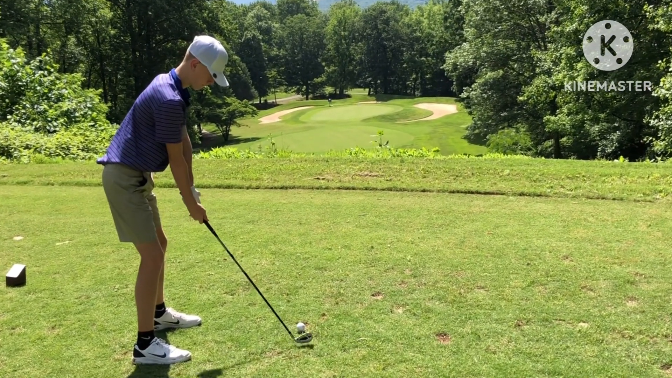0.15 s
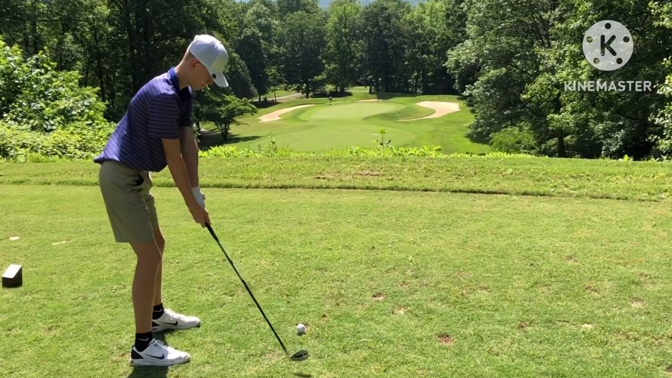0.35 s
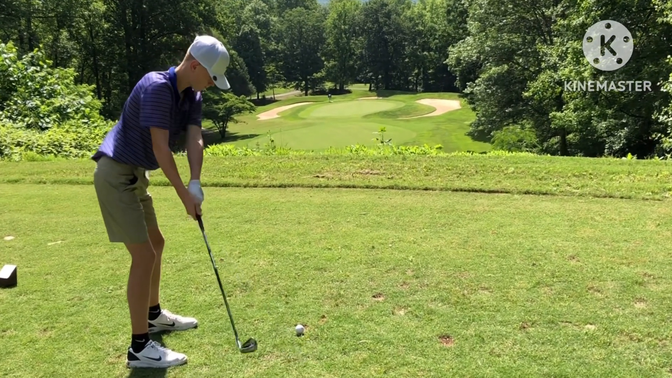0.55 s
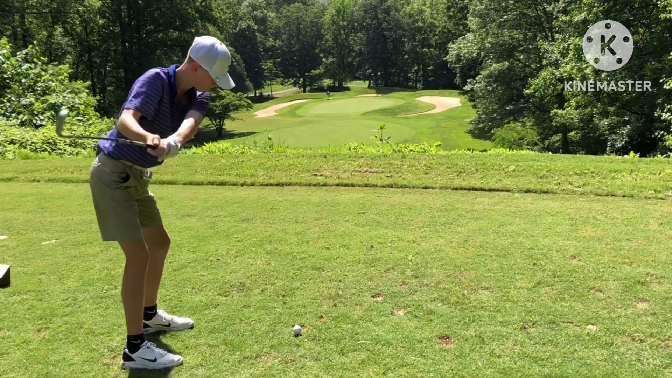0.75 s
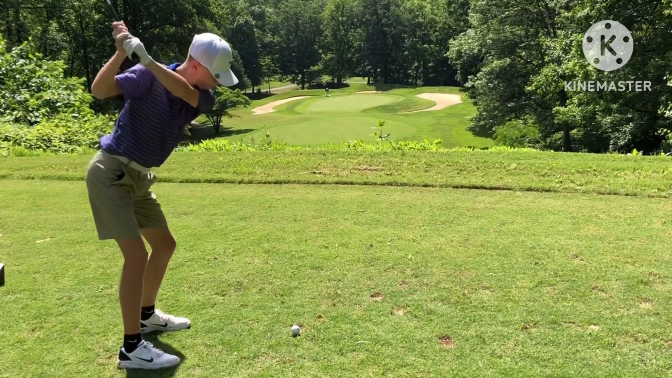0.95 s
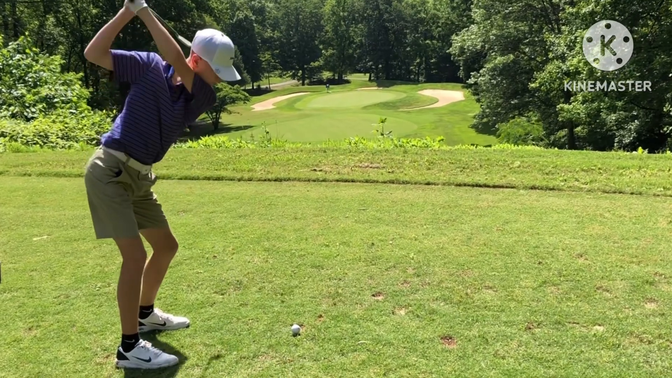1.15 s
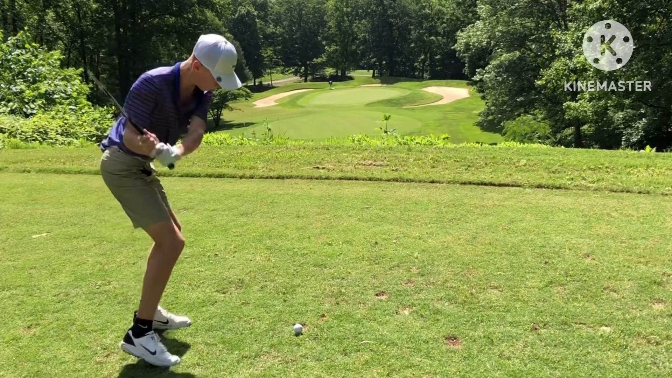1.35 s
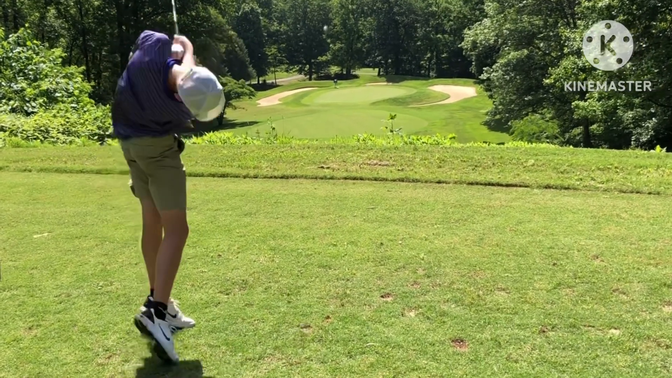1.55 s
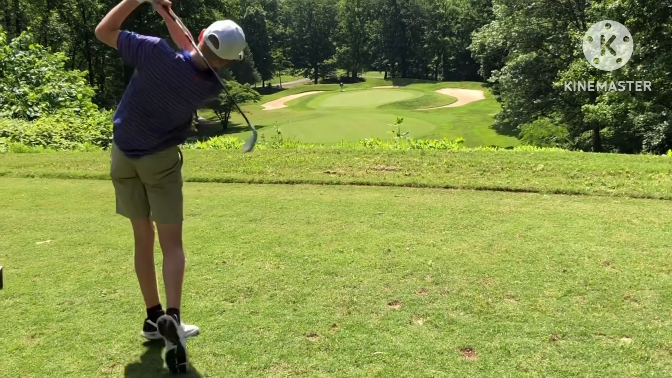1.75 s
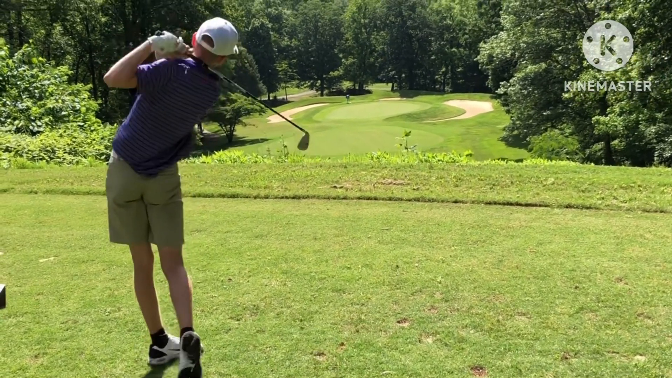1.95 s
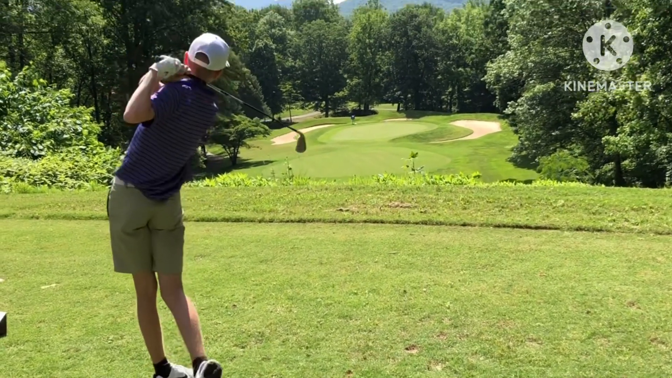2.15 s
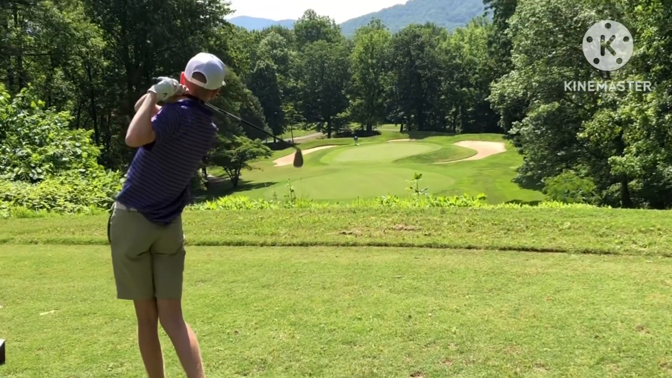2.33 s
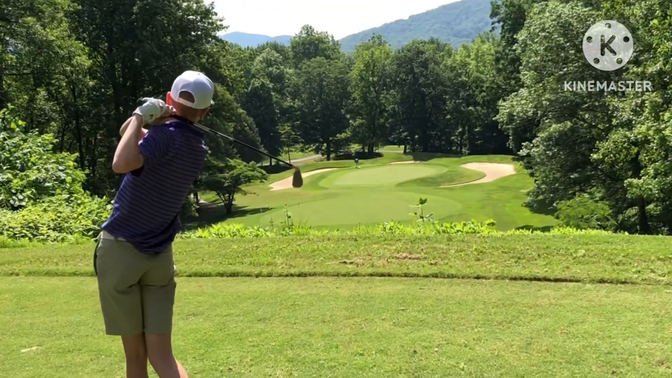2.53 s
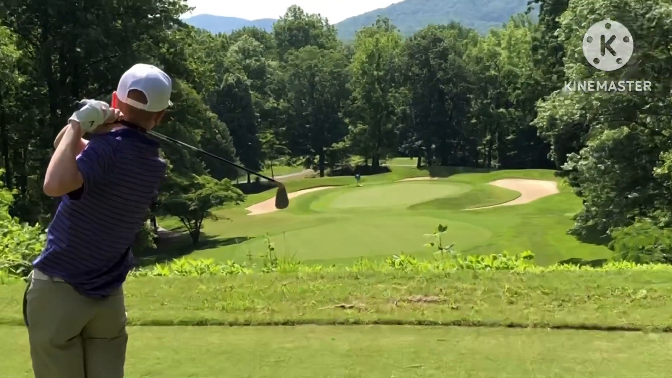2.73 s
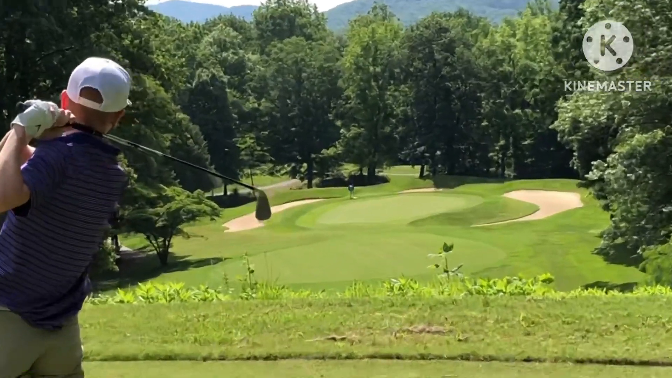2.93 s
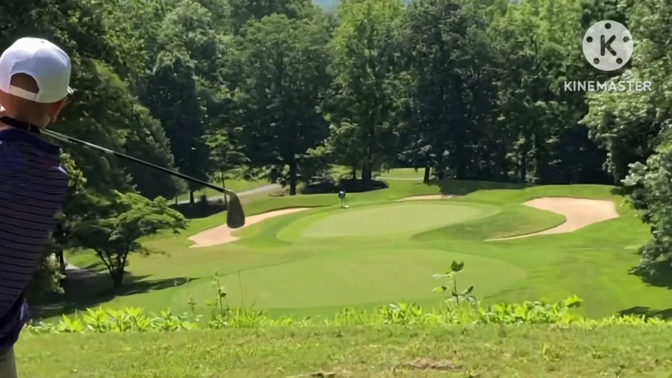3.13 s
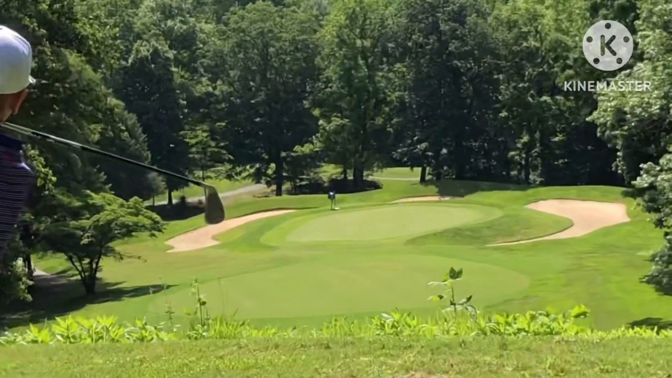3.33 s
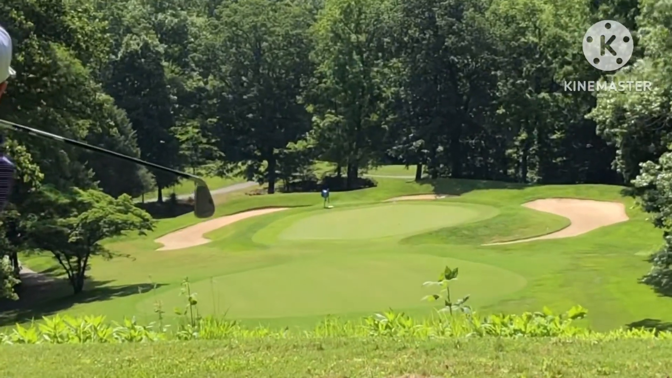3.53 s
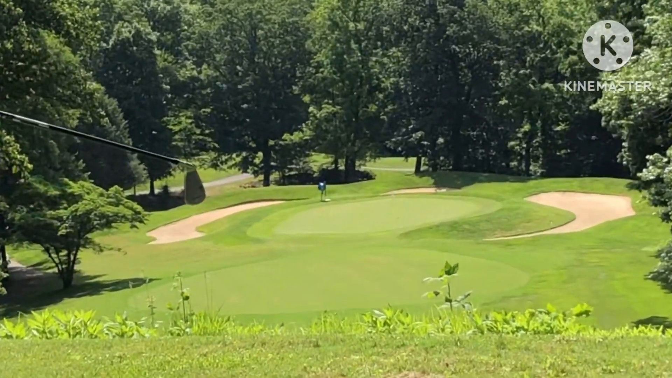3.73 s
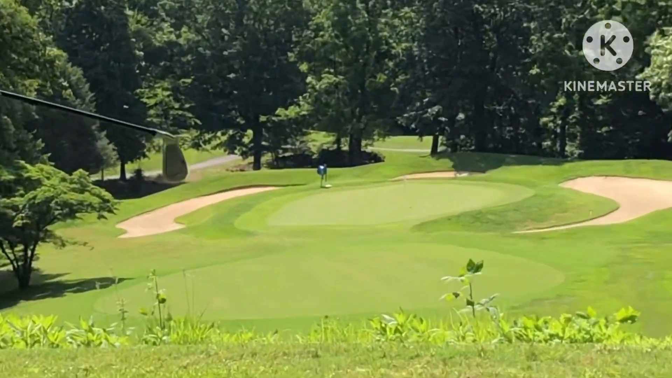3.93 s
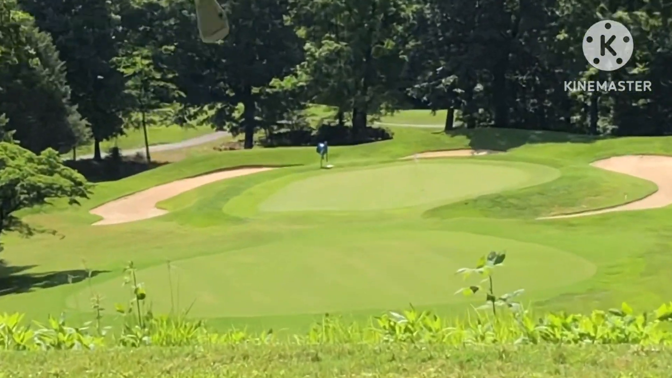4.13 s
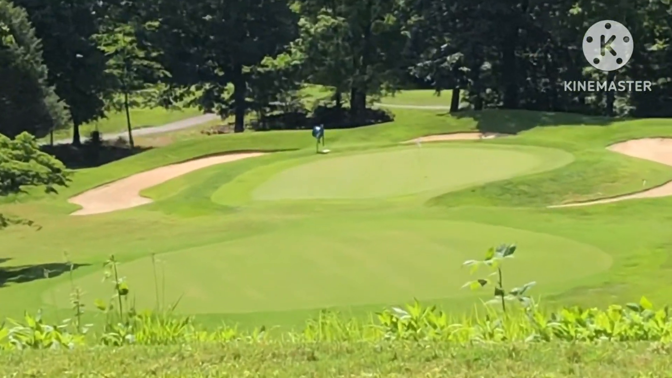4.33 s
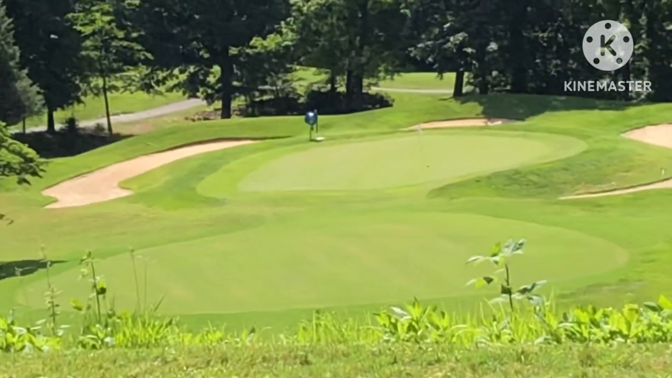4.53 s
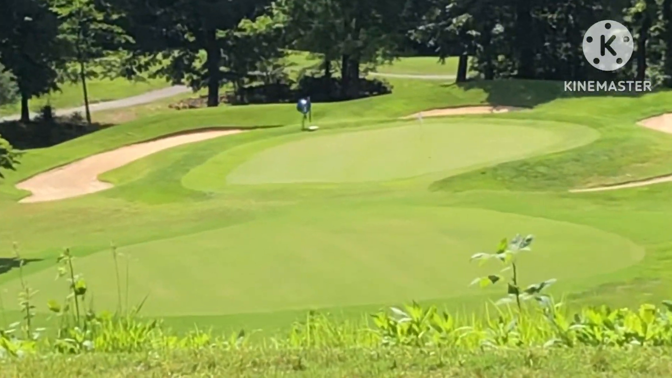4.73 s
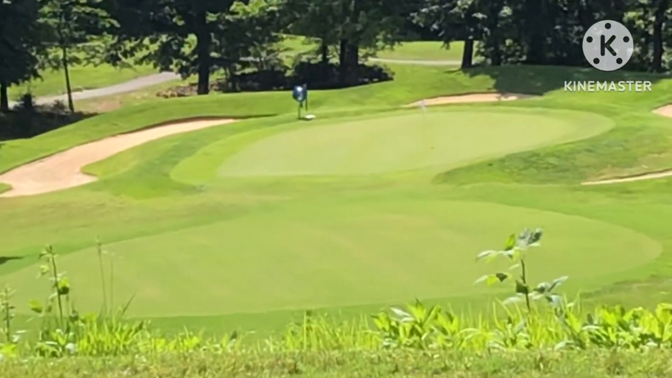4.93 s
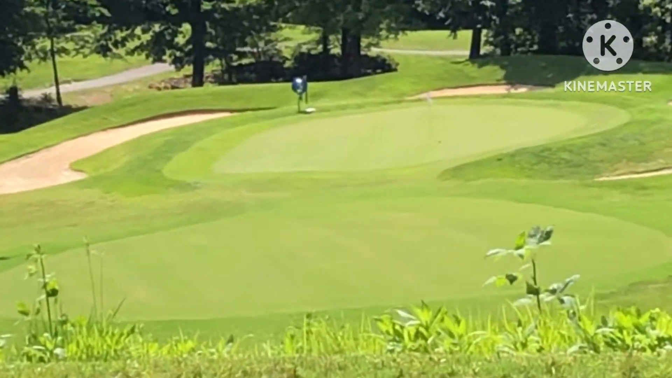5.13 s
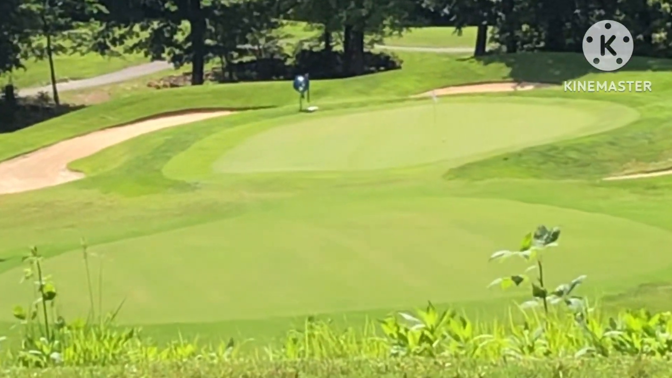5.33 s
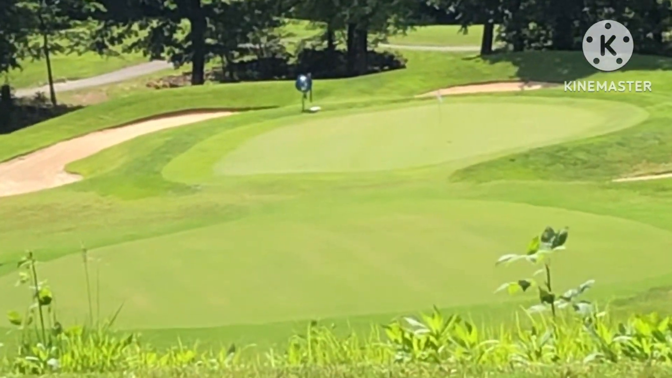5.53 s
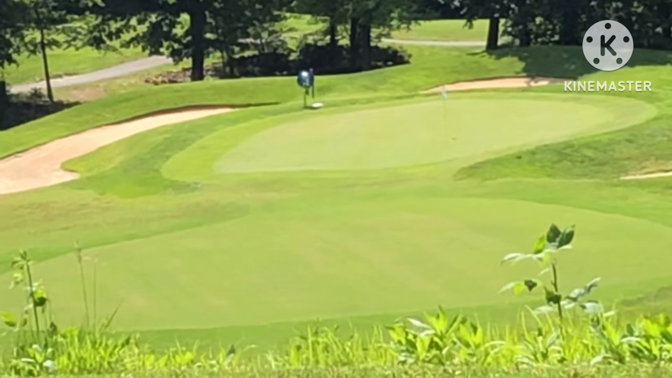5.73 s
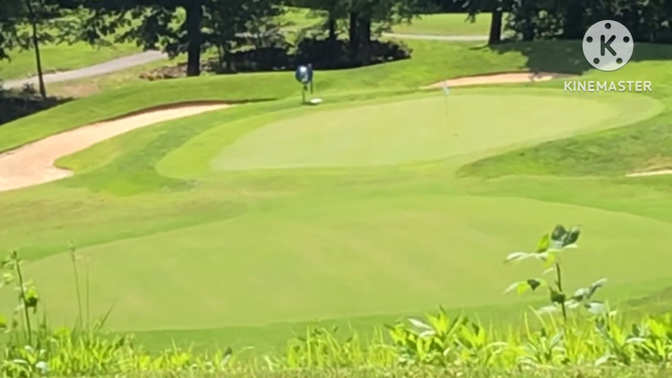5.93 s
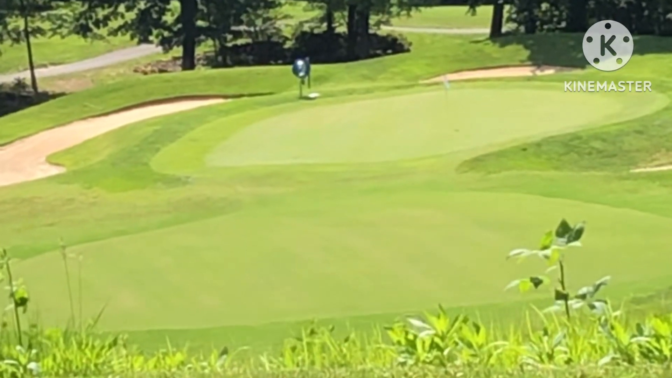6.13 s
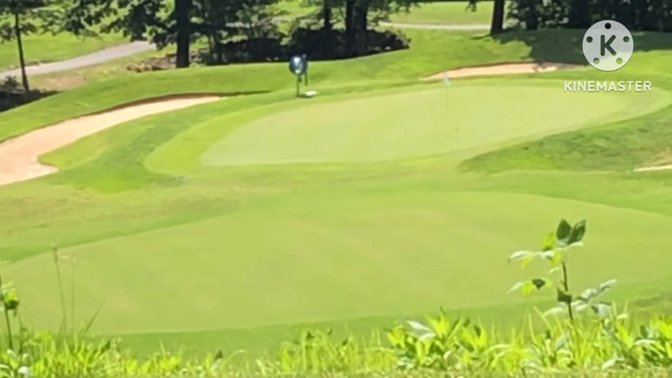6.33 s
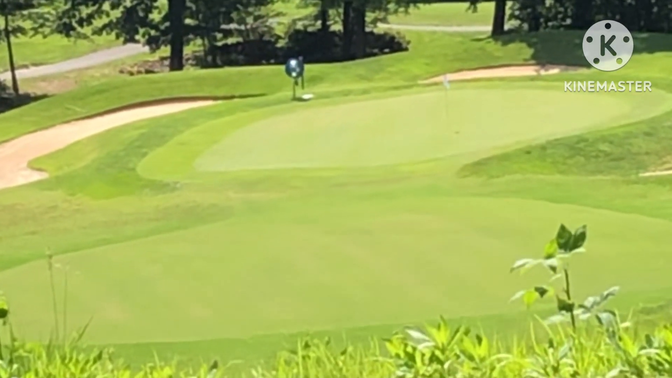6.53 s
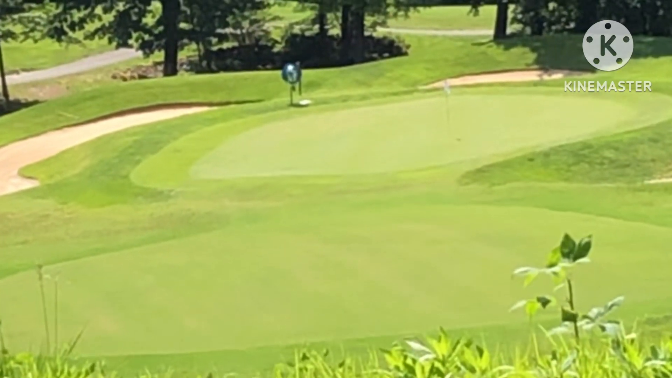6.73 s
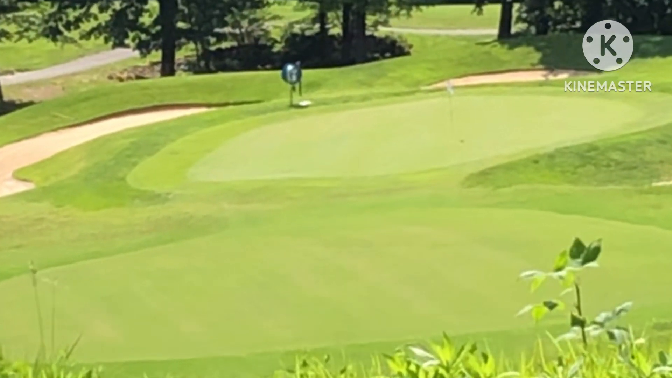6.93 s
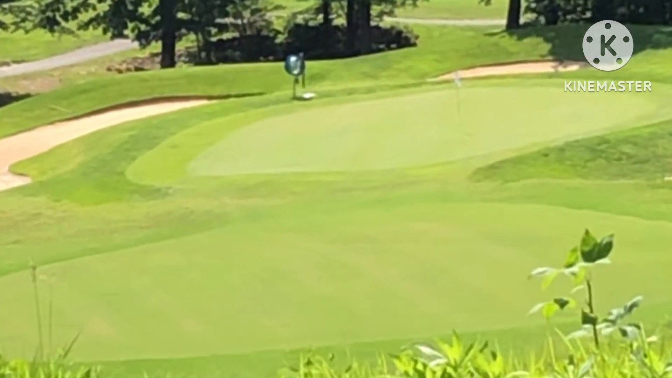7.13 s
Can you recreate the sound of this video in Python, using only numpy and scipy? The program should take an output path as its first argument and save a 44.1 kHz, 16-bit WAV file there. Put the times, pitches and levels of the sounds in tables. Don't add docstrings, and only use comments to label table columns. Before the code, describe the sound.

A golf club whooshes and cracks hard against a ball, echoing off surrounding trees, with songbirds whistling over soft wind and a faint distant drone.

```python
import sys
import numpy as np
from scipy import signal
from scipy.fft import rfft, irfft, next_fast_len
from scipy.io import wavfile
from scipy.ndimage import map_coordinates

SR = 44100
rng = np.random.default_rng(int(sys.argv[2]) if len(sys.argv) > 2 else 0)


def wrap_up_sound(samples):
    columns = np.atleast_2d(samples).T
    tamed = np.clip(columns, -1, 1)
    steps = np.round(tamed * 32767).astype(np.int16)
    wavfile.write(sys.argv[1], SR, steps)


def magnitude_from_level(level_db):
    exponent = np.asarray(level_db, float) / 20
    return 10 ** exponent


N = 316241


def unit(x):
    return x / np.sqrt(np.mean(x ** 2) + 1e-20)


def along(points, hz):
    f, *cols = np.transpose(points)
    return np.squeeze([np.interp(np.log(hz + 1), np.log(f + 1), c) for c in cols])


def curves(rows):
    s, *cols = np.transpose(rows)
    return [np.interp(np.arange(N) / SR, s, c) for c in cols]


def wobble(rate):
    knots = rng.standard_normal(int(N * rate / SR) + 4)
    return map_coordinates(knots, [np.arange(N) * rate / SR])


def noise(gain):
    m = next_fast_len(N)
    spectrum = rfft(rng.standard_normal(m)) * gain(np.fft.rfftfreq(m, 1 / SR))
    return unit(irfft(spectrum, m)[:N])


def coloured(spectrum):
    return noise(lambda hz: magnitude_from_level(along(spectrum, hz)))


def since(s):
    return np.maximum(np.arange(N) / SR - s, 0)


def ring(modes, s, attack):
    start = round(s * SR)
    t = since(s)[start:][:SR // 4]
    tones = sum(-magnitude_from_level(db - 60 * t / t60) * np.sin(2 * np.pi * hz * t) for hz, db, t60 in modes)
    out = np.zeros(N)
    out[start:][:len(t)] = tones * (1 - np.exp(-t / attack))
    return out


def scattered(spectrum, shape):
    hz, t, z = signal.stft(rng.standard_normal(2 * SR), SR, nperseg=256)
    rise, t60 = along(shape, hz)[:, :, None]
    fading = magnitude_from_level(along(spectrum, hz)[:, None] - 60 * t / t60)
    return unit(signal.istft(z * fading * (1 - np.exp(-t / rise)), SR, nperseg=256)[1])


def placed(x, s):
    return np.pad(x, (round(s * SR), N))[:N]


def air():
    # (time [s], strength [dB])
    breeze = [(0, 1), (.5, 0), (1.1, -.8), (1.5, 8), (2, 3), (2.5, 1.1), (3.1, -0.1), (3.75, -2),
              (4.05, -2), (4.3, 0.5), (4.6, -0.9), (5, 0.3), (5.5, 1), (6.1, -0.4), (6.7, -1), (7.17, 1.4)]
    # (frequency [Hz], level [dB per Hz])
    rumble_colour = [(12, -54.5), (20, -25.5), (42, -9.5), (113, -2), (145, -2), (184, -2.5), (331, -13),
                     (371, -11), (400, -11), (520, -45), (880, -120)]
    traffic_colour = [(150, -29), (250, -1), (328, -8.5), (373, -4), (398, -12.5), (425, -5), (722, -6.5),
                      (790, -5.5), (1650, -9.5), (1900, -11), (3410, -18), (5500, -30), (7150, -59),
                      (12100, -120)]
    leaf_colour = [(2500, -28.5), (4100, -1.5), (4700, -7.5), (6500, 1.5), (9000, -7), (13000, -17.5),
                   (16000, -18)]
    hiss_colour = [(2000, -30), (5000, -1), (9000, -1), (13000, -2), (16000, -3.5)]
    breeze_db, = curves(breeze)
    gust = wobble(3.08)
    rumble_db = -57 + breeze_db + 1.1 * gust + 1.2 * wobble(12)
    traffic_db = -57.5 + 0.41 * breeze_db + .4 * gust + 0.67 * wobble(10)
    leaves_db = -76.5 - 0.8 * since(0) + .8 * wobble(8) + .9 * gust
    rumble = magnitude_from_level(rumble_db) * coloured(rumble_colour)
    traffic = magnitude_from_level(traffic_db) * coloured(traffic_colour)
    leaves = magnitude_from_level(leaves_db) * coloured(leaf_colour)
    return rumble + traffic + leaves + magnitude_from_level(-77.5) * coloured(hiss_colour)


def drone():
    firing_hz, width_hz, steady_db = 122, 11, -69
    turn_s, turn_length_s, turn_db = 5.6, 0.43, 8.5
    swell_db = turn_db * np.exp(-((np.arange(N) / SR - turn_s) / turn_length_s) ** 2)
    return magnitude_from_level(steady_db + swell_db) * noise(lambda hz: 1 / (1 + ((hz - firing_hz) / width_hz) ** 2))


def note_curves(rows, bend, loudest, fade_db):
    u = np.linspace(0, 1, num=12)
    paths = []
    for s, length, hz, to_hz, db in rows:
        pitch = hz + (to_hz - hz) * bend(u)
        paths.append(np.transpose([s + length * u, pitch, db - fade_db * np.abs(u - loudest)]))
    return paths


def whistles(paths, quaver_db, blur_hz, wet_db, t60):
    t, voice = np.arange(N) / SR, np.zeros(N)
    blur = blur_hz * wobble(320)
    for path in paths:
        s, hz, db = np.transpose(path)
        span = slice(round((s[0] - .004) * SR), round((s[-1] + .004) * SR))
        u = t[span]
        to_edge = np.minimum(u - u[0], u[-1] - u)
        soft = np.sin(np.pi / 2 * np.clip(to_edge / 0.0047, 0, 1))
        phase = 2 * np.pi * np.cumsum(np.interp(u, s, hz) + blur[span]) / SR
        voice[span] += np.sqrt(2) * magnitude_from_level(np.interp(u, s, db)) * soft * np.sin(phase)
    tail = scattered([(1000, 0)], [(2500, .004, 0.58 * t60), (5000, .004, t60)])[:SR]
    trunks = scattered([(1000, 0)], [(4000, .003, .09)])[:SR // 5]
    voice = voice + magnitude_from_level(wet_db - 2.0) * signal.fftconvolve(voice, trunks / np.linalg.norm(trunks))[:N]
    echo = magnitude_from_level(wet_db) * signal.fftconvolve(voice, tail / np.linalg.norm(tail))[:N]
    flicker = magnitude_from_level(quaver_db * wobble(70) + 0.17)
    return flicker * (voice + echo)


def birds():
    chirps = [(3.232, 0.063, 4540, 2950, -63.5), (3.383, 0.039, 4360, 3050, -66),
              (4.355, .045, 4550, 3700, -70), (5.635, 0.043, 4440, 3790, -74),
              (5.748, .072, 4680, 3000, -64.5), (5.887, 0.043, 4480, 3250, -68),
              (6.014, .02, 4100, 3530, -67.5)]
    slides = [(.42, .05, 3540, 3460, -69), (3.46, 0.019, 3270, 3940, -65),
              (3.482, 0.025, 4100, 5680, -80.5), (4.185, .205, 3324, 3310, -63.5),
              (4.5, 0.034, 4150, 2900, -67), (4.61, 0.033, 4120, 2770, -65), (4.7, .025, 2480, 2490, -67.5),
              (5.655, .02, 2900, 2733, -69), (5.75, .028, 3260, 3260, -69.5)]
    hooks = [(3.62, 0.037, 2500, 3310, -64.5), (3.918, 0.06, 3660, 4760, -62.5),
             (4.102, .045, 2880, 2970, -55.5), (4.1, .02, 2500, 2750, -58), (4.783, .06, 3700, 5000, -71.5),
             (4.905, .06, 3900, 5280, -73), (5.075, 0.029, 2840, 3650, -70)]
    glides = [(1.06, 0.024, 3340, 3966, -66.5), (1.158, .022, 3440, 3100, -66),
              (1.18, 0.018, 3110, 3970, -61.5), (1.2, .026, 3970, 2790, -63),
              (1.235, 0.026, 2810, 2970, -67), (2.57, .035, 3260, 3300, -65.5),
              (2.675, .027, 3260, 3263, -67), (3.572, .028, 3130, 2500, -67),
              (3.655, 0.024, 3190, 2720, -65.5), (4.062, 0.026, 2810, 2480, -59),
              (4.12, 0.027, 2300, 2160, -63.5), (4.135, .018, 2750, 2500, -62.5),
              (4.157, 0.031, 2685, 3295, -51.5), (4.18, .022, 2900, 2905, -68),
              (4.425, .05, 2280, 2094, -66), (5.055, .03, 3160, 2840, -67), (5.2, .075, 2560, 3760, -67),
              (5.35, 0.062, 3620, 3420, -76), (6.2, 0.049, 1740, 1645, -63),
              (6.29, 0.038, 2200, 2170, -70.5), (6.318, .03, 2980, 4080, -65.5),
              (6.39, .04, 3034, 2590, -65), (6.43, 0.031, 2590, 3280, -62.5), (6.47, .045, 2560, 2595, -65)]
    scoops = [
        (2.455, .085, 3050, 2860, -69.5),
        (3.985, .057, 6170, 2960, -57.5),
        (5.092, .07, 3720, 2475, -63),
        (6.278, 0.046, 4700, 2930, -64.5),
    ]
    valley = [(4.84, .08, 5100, 5200, -84), (4.96, .13, 5300, 5250, -82), (5.1, .12, 5260, 5240, -84),
              (5.19, .09, 3560, 3720, -76), (5.27, .035, 3750, 4400, -79), (5.3, 0.094, 3540, 3560, -77),
              (6.3, 0.16, 4875, 4000, -80)]

    def straight(u):
        return u

    close = note_curves(chirps, lambda u: u ** 1.9, loudest=0.72, fade_db=8.0)
    close = close + note_curves(slides, straight, loudest=.3, fade_db=5.0)
    deep = note_curves(hooks, lambda u: np.minimum(u / 0.5, 1) ** 0.88, loudest=0.43, fade_db=9.5)
    deep = deep + note_curves(glides, straight, loudest=0.77, fade_db=6.0)
    deep = deep + note_curves(scoops, lambda u: 1 - (1 - u) ** 2.1, loudest=0.59, fade_db=14)
    distant = note_curves(valley, straight, loudest=.3, fade_db=5.0)
    near = whistles(close, quaver_db=3.2, blur_hz=16, wet_db=-12, t60=.5)
    far = whistles(deep, quaver_db=2.0, blur_hz=48, wet_db=-3.5, t60=0.83)
    return near + far + whistles(distant, quaver_db=1.5, blur_hz=120.05, wet_db=-1.0, t60=0.73)


def ticks():
    # (time [s], length [s], level [dB])
    stem_ticks = [(1.089, 0.019, -64), (1.356, .01, -67), (3.066, .003, -64.5), (3.08, .003, -66),
                  (3.144, 0.0026, -61.5), (3.657, .003, -66), (6.617, 0.0034, -66), (5.765, .005, -71)]
    # (frequency [Hz], level [dB per Hz])
    stem_colour = [(1200, -30), (2800, 1), (5000, -3), (8000, -11), (12000, -15), (16000, -13)]
    t = np.arange(N) / SR
    puffs = sum(magnitude_from_level(db) * np.exp(-((t - s) / length) ** 2) for s, length, db in stem_ticks)
    return puffs * coloured(stem_colour)


def knock():
    # (time [s], peak level [dB])
    contacts = [
        (1.282, -21.5),
        (1.2872, -27),
        (1.3006, -43),
    ]
    # (frequency [Hz], level [dB], t60 [s])
    hollow_modes = [(149, 0, 0.058), (238, 0, 0.038), (406, -7.5, 0.066), (702, 0, 0.032),
                    (889, -13, 0.046), (1160, -10.5, 0.061), (1590, -16, .03)]
    # (frequency [Hz], level [dB per Hz])
    roll_colour = [(53, -38), (90, -7), (162, 1.5), (388, 1), (462, -6), (1160, -4.5), (2330, -28.5),
                   (4000, -35), (5200, -63.5), (8800, -120)]
    body = sum(magnitude_from_level(db) * ring(hollow_modes, s, attack=0.0014) for s, db in contacts)
    lift = [(90, -4.5), (500, -1.0), (1500, 4), (2300, 7.5), (4000, -1)]  # Hz, dB brighter at the start
    lifted = [(hz, db + along(lift, hz)) for hz, db in roll_colour]
    fading = [(99.655, .015, 1.2), (350, .012, 1.1), (1005.1, 0.01195, 0.6), (3000, .01, .5)]
    roll = scattered(lifted, fading)
    return magnitude_from_level(-4.5) * body + magnitude_from_level(-56.5) * placed(roll, contacts[0][0])


def swing():
    # (time [s], head speed [share of top])
    head_speed = [(1.36, .6), (1.42, .76), (1.455, 0.98), (1.49, 1), (1.503, .985), (1.515, .7),
                  (1.56, .55), (1.65, .45), (1.8, 0.56)]
    # (frequency [Hz], level [dB per Hz])
    whoosh_colour = [(410, -34), (700, -2.5), (1090, -3.5), (1570, -9.5), (2640, -7.5), (3050, -18.5),
                     (3420, -11), (4270, -22), (15700, -28.5)]
    shaft_hz, shaft_db, shaft_power = 568, -44, 4.1
    full_from_s, full_to_s = 1.46, 1.54
    rise_db_per_s, fall_db_per_s = 242, 86
    speed, = curves(head_speed)
    t = np.arange(N) / SR
    moving = (t > head_speed[0][0]) & (t < head_speed[-1][0])
    whoosh_db = -45.5 - rise_db_per_s * np.maximum(full_from_s - t, 0) - fall_db_per_s * since(full_to_s)
    whoosh = magnitude_from_level(whoosh_db + 1.7 * wobble(88)) * coloured(whoosh_colour)
    flutter = 1.0 + wobble(190) + 1j * wobble(190)
    tone = unit((flutter * np.exp(2j * np.pi * np.cumsum(shaft_hz * speed) / SR)).real)
    return moving * (whoosh + magnitude_from_level(shaft_db) * speed ** shaft_power * tone)


def rustles():
    # (time [s], length [s], level [dB], centre [Hz])
    brushes = [(1.785, .006, -68, 11400), (1.927, 0.0073, -74, 11000), (2.36, .14, -72, 4600),
               (2.43, .02, -56, 199), (2.445, 0.0056, -47.5, 495), (3.5, .005, -54.5, 502),
               (3.588, .03, -57, 57), (4.923, 0.032, -56, 60.36), (1.99, 0.009, -55, 1200),
               (2.018, 0.0052, -51.5, 890), (2.165, 0.0052, -75, 12200), (3.553, 0.0075, -50, 450.5),
               (2.68, .02, -55, 220), (1.521, 0.0055, -44, 140), (1.445, .012, -50, 90)]
    t, out = np.arange(N) / SR, np.zeros(N)
    for s, length, db, centre_hz in brushes:
        band = signal.butter(2, [centre_hz / 1.17, centre_hz * 1.055], "band", fs=SR)
        span = slice(round((s - 3 * length) * SR), round((s + 3 * length) * SR))
        puff = unit(signal.lfilter(*band, rng.standard_normal(SR)))[-len(t[span]):]
        out[span] += magnitude_from_level(db) * puff * np.exp(-((t[span] - s) / length) ** 2)
    return out


def strike():
    # (time [s], peak level [dB])
    blow = (1.50604, .8)
    # (delay [s], level [dB])
    dull_echoes = [(0.0236, -33.5)]
    # (frequency [Hz], level [dB], t60 [s])
    face_modes = [(680, -17, .01), (1410, -7, .0115), (2520, 6, .0105), (3100, -18, .03), (3480, -11, .01),
                  (4540, -25, .018), (5400, -17, .008), (6530, 3, .003), (7500, -25, .0046),
                  (8270, 7, .0013), (9330, -15, .005), (11600, 4, .0011), (13500, 5, .0015),
                  (15300, -1.5, .002)]
    twist_modes = [(1860, -4, .0115)]
    thud_modes = [(109.9, -32.5, 0.053), (307, -22.5, .025), (518, -28, .02), (1131, -14, 0.016)]
    bank_modes = [(2730, -14.5, .016)]
    # (frequency [Hz], level [dB per Hz])
    answer_colour = [(88, -35.5), (150, -2.5), (235, 1.5), (374, -6), (446, -8), (864, -18), (953, -12),
                     (1110, -14.5), (2380, -4), (2670, 0), (3370, -10), (4100, -8.5), (5080, -17.5),
                     (7210, -14.5), (15700, -25.5)]
    # (frequency [Hz], rise [s], t60 [s])
    woods_fading = [(200, 0.028, 1), (500, 0.058, 1.54), (1000, 0.097, 2.14), (2100, 0.071, 1.02),
                    (2800, 0.051, 1.027), (4500, 0.0203, 1.04), (7000, 0.006, 0.87), (11000, 0.0075, .6),
                    (15423, 0.011, .5)]
    ground_s, bank_s, tree_line_s = .0024, .0118, .052
    s, db = blow
    t = since(s)

    leaving = np.exp(-(t / .0067) ** 4)
    ringing = ring(face_modes, s, attack=.00043) - ring(twist_modes, s, attack=.00043)
    direct = magnitude_from_level(db) * leaving * ringing
    thud = ring(thud_modes, s, attack=0.00066)

    bright = signal.lfilter(*signal.butter(4, 4500, "high", fs=SR), direct)
    ground = magnitude_from_level(-9.5) * placed(bright, ground_s)
    dull = signal.lfilter(*signal.butter(2, [2680, 3000], "band", fs=SR), direct)
    returns = sum(magnitude_from_level(echo_db) * placed(dull, delay) for delay, echo_db in dull_echoes)
    bank = ring(bank_modes, s + bank_s, attack=.0018)

    turf = since(s - .0038)
    scuff_colour = [(200, -10.5), (900, -1.5), (3000, -2.5), (16000, -12.5)]
    scuff = magnitude_from_level(-23) * np.minimum(turf / 0.00083, 1) * magnitude_from_level(-60 * t / .016) * coloured(scuff_colour)
    push = magnitude_from_level(-9) * np.exp(-((turf - .0035) / 0.00014) ** 2)

    near_tail = scattered(answer_colour, [(300, 0.0037, .25), (9040, .004, 0.07)])
    near = magnitude_from_level(-69) * placed(near_tail, s + .004)
    woods_tail = scattered(answer_colour, woods_fading)
    woods = magnitude_from_level(-52.5 + 1.55 * wobble(45.04)) * placed(woods_tail, s + tree_line_s)
    return direct + ground + thud + returns + bank + scuff + push + near + woods


def scene():
    ambience = air() + drone() + birds() + ticks()
    return (ambience + knock() + swing() + rustles() + strike())[None]


def top_cut(x):
    return signal.sosfilt(signal.butter(12, 16610, fs=SR, output="sos"), x)


def record(dry):
    narrow = signal.sosfiltfilt(signal.ellip(10, .1, 60, 15800, fs=SR, output="sos"), dry)
    narrow = signal.lfilter(*signal.butter(1, 30, "high", fs=SR), narrow)
    clipped = narrow / (1 + np.abs(narrow / .97) ** 8) ** (1 / 8)
    return top_cut(clipped)


dry = scene()
out = record(dry)
wrap_up_sound(out)
```